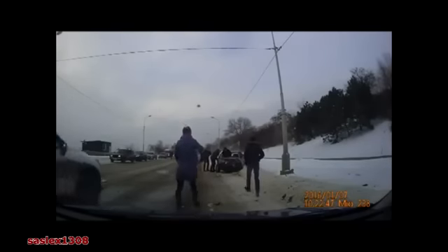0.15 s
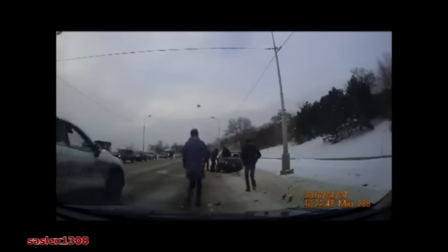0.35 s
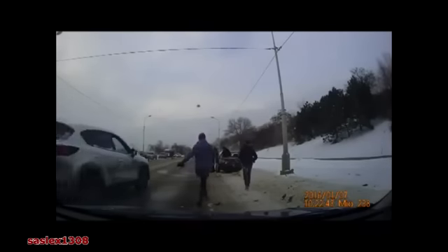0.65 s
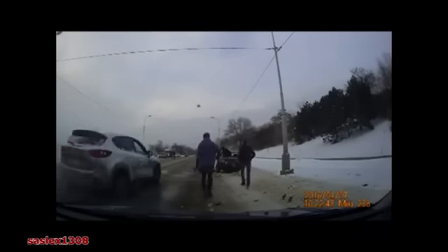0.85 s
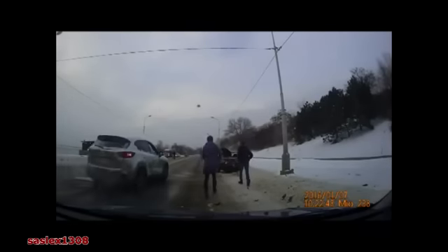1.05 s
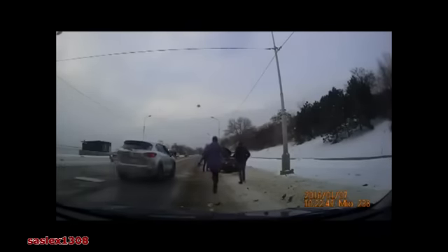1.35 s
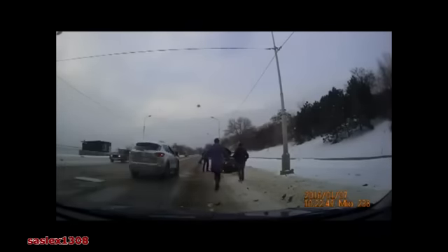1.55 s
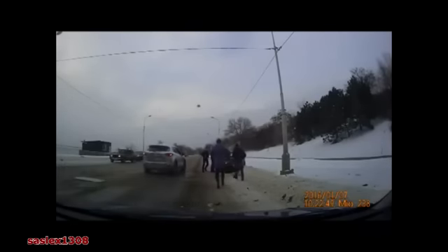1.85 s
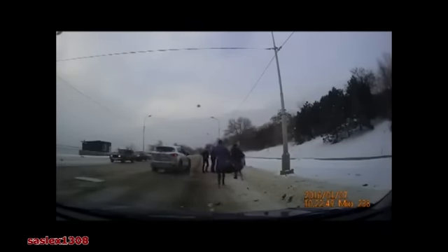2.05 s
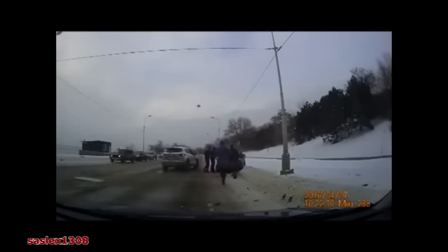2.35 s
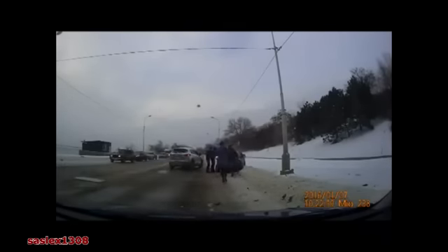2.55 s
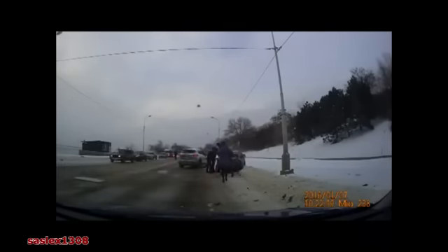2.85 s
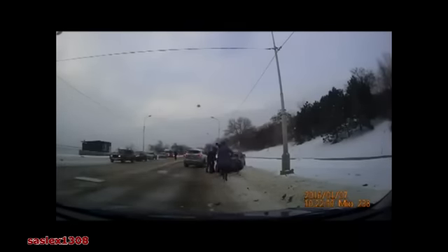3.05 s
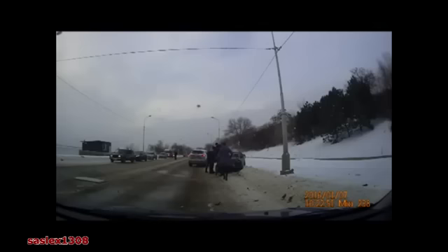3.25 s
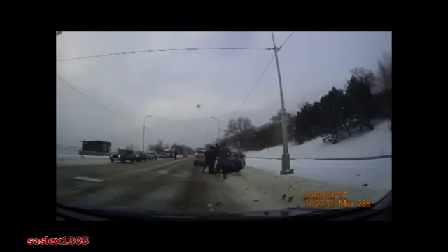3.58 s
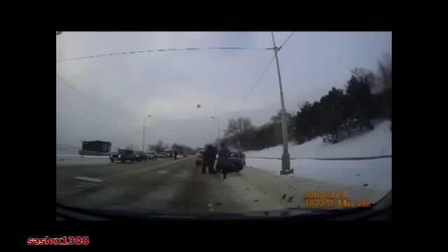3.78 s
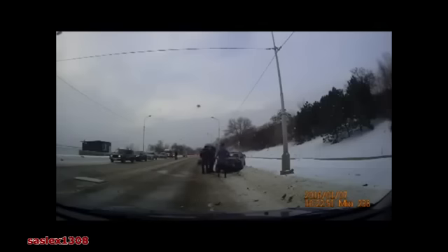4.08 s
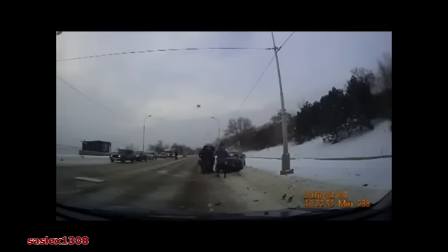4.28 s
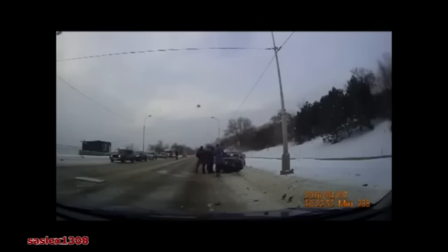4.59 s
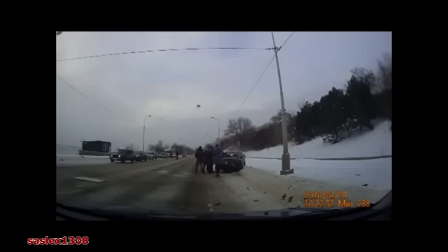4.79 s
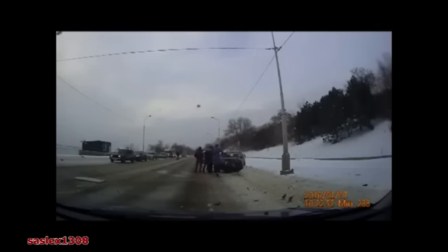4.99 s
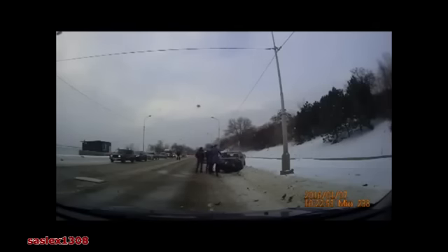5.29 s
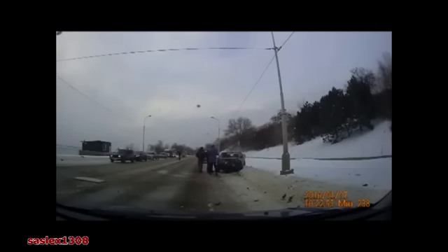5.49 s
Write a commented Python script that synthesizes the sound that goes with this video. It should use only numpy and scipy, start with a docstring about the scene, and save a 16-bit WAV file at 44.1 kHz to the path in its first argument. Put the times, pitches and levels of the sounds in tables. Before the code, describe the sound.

Inside a stopped car, a microphone at the windscreen picks up a hazard flasher relay, its dry tick starting at about 0.13 seconds and repeating roughly every 0.75 seconds, each followed about 0.3 seconds later by a slightly different tock. A low engine boom with a faint panel drone holds for about 0.3 seconds, then dies away, leaving a very weak idle rumble. Tiny creaks and rustles occur within the first second. At 0.93 to 0.96 seconds the gear lever clunks home: several fast, gritty latch clacks and a heavier hollow console thump, the loudest moment. A thin hiss near 3 kHz opens around it, sags and closes by 3.8 seconds. Muffled traffic swells slightly near 1 second, then settles. Faint rustles follow around 1.6 seconds, very soft bumps at 4.7 and 5.4, and one light trim knock at 5.53. Steady microphone hiss runs throughout.

```python
"""Inside a stopped car the hazard flasher relay goes tick-tock over the low hum of the idling engine.
Something creaks; the hum is already dying down when the gear lever clunks home; a thin hiss swells and
fades. Near the end comes one light knock on the trim. Contacts are impulses ringing damped modes; the
cabin's answer, rustles, bumps, rumble, traffic, soft low bursts and hiss are coloured noise; hum and
creaks are wavering sines."""
import sys
import numpy as np
from scipy import signal
from scipy.fft import irfft, next_fast_len
from scipy.io import wavfile

SR = 44100
rng = np.random.default_rng(int(sys.argv[2]) if len(sys.argv) > 2 else 0)


def materialize(psi):
    """Save the field psi as 16-bit PCM at rate SR to the path in sys.argv[1].

    A 1-D psi becomes a single channel; in a 2-D psi each row is a channel.
    """
    bounded = np.clip(np.atleast_2d(psi).T, -1, 1)
    quanta = np.round(bounded * 32767).astype(np.int16)
    wavfile.write(sys.argv[1], SR, quanta)


N = 248283
TIME = np.arange(N) / SR  # seconds


# The flasher's timer counts in steps. Each row, one flash: steps lit, steps dark.
FLASH_STEPS = [(18, 29), (18, 30), (17, 31), (17, 30), (17, 30), (19, 29), (17, 30), (17, 30)]
TIMER_STEP_S, FIRST_FLASH_S = 0.016, 0.1322


def flasher_times():
    """Timed switching: the relay pulls in (tick) when the lamp lights and lets go (tock) when it darkens."""
    lit, dark = np.transpose(FLASH_STEPS) * TIMER_STEP_S
    period = lit + dark
    ticks = FIRST_FLASH_S + np.cumsum(period) - period
    tocks = ticks + lit
    return ticks, tocks[tocks < TIME[-1]]


# Colour of the dull, quickly dying cabin reflections.
# Each row: frequency in Hz, relative density in dB per Hz.
CABIN_COLOUR = [(150, -5), (400, 1), (750, -10.5), (1000, -1.5), (1400, -4), (2000, 5.5), (2700, 0),
                (3600, -11), (4600, -25), (5700, -10), (7500, -29)]


def relay_strokes(strokes, bounces, modes, level_db, scatter_db, cabin_db, cabin_t60):
    """Impact excitation: each stroke repeats its bounces at scattered strengths; the cabin answers briefly."""
    chance = rng.standard_normal((len(strokes), len(bounces)))
    contacts = []
    for i, stroke in enumerate(strokes):
        for k, (delay, bounce_db) in enumerate(bounces):
            contacts.append((stroke + delay, bounce_db + scatter_db * chance[i, k]))
    ringing = from_db(level_db) * ring(clicks(contacts), modes)
    decay = dying(strokes, np.zeros(len(strokes)), t60=cabin_t60, rise_s=0.0057)
    return ringing + from_db(cabin_db) * decay * noise(CABIN_COLOUR)


# The armature hits and bounces on pulling in.
# Each row: delay after the stroke in seconds, relative strength in dB.
TICK_BOUNCES = [(0.0, 1.5), (0.00152, 4.5), (0.00353, -5), (0.00621, -6.5), (0.00949, -9), (0.0148, -7.5)]
# Relay and housing ringing at this stop.
# Each row: frequency in Hz, relative level in dB, 60 dB decay time in seconds.
TICK_MODES = [(1573, -53.5, 0.064), (1832.5, -38.5, 0.058), (1996, -61, 0.092), (2100, -63.5, 0.06),
              (2206, -44.5, 0.025), (2554, -63.5, 0.069), (2726, -53.5, 0.018), (3504, -56, 0.045),
              (3590, -45, 0.0082), (3764, -58, .05)]


def relay_tick(strokes):
    """Modal ringing: the armature's bounces at the pull-in stop strike relay and housing."""
    return relay_strokes(strokes, TICK_BOUNCES, TICK_MODES, level_db=-1.65, scatter_db=0.2,
                         cabin_db=-49.0, cabin_t60=0.053)


# The armature hits and bounces on letting go.
# Each row: delay after the stroke in seconds, relative strength in dB.
TOCK_BOUNCES = [(0.0, 0.5), (0.00187, -11), (0.00585, 3), (0.01024, 1.9), (0.0109, -3.5)]
# Relay and housing ringing at the other stop.
# Each row: frequency in Hz, relative level in dB, 60 dB decay time in seconds.
TOCK_MODES = [(769, -55, 0.083), (901, -57.5, 0.077), (1620, -88, 0.12), (1891, -50, 0.045),
              (2260, -69, 0.12), (2501, -45.5, 0.03), (2619, -43.5, 0.07), (2890, -64.5, 0.087),
              (3450, -63, 0.033)]


def relay_tock(strokes):
    """Modal ringing: the other stop excites another set of modes of the same relay and housing."""
    return relay_strokes(strokes, TOCK_BOUNCES, TOCK_MODES, level_db=-1.0, scatter_db=1.26,
                         cabin_db=-51.5, cabin_t60=0.074)


# The lever is unlocked, rides over two detents and lands. Each row: start in seconds,
# strength on the latch in dB, strength on the console in dB, gap to the first bounce in seconds.
LEVER_BLOWS = [(0.92632, -7, -10, 0.0024), (0.93405, 3.5, -4.5, 0.0031), (0.94823, -1.5, -4, 0.00685),
               (0.96044, 1, 5.5, 0.00606)]
# Ratio of one gap to the one before, and loss per bounce on latch and console.
BOUNCE_GAP_RATIO, LATCH_LOSS_DB, CONSOLE_LOSS_DB = 0.895, 3.5, 3


def lever_contacts(count):
    """Inelastic bouncing: each blow is a run of closer, weaker contacts (s, latch dB, console dB)."""
    contacts = []
    for start, latch_db, console_db, gap in LEVER_BLOWS:
        for k in range(count):
            s = start + gap * sum(BOUNCE_GAP_RATIO ** j for j in range(k))
            contacts.append((s, latch_db - LATCH_LOSS_DB * k, console_db - CONSOLE_LOSS_DB * k))
    return contacts


# Modes of the latch.
# Each row: frequency in Hz, level in dB for a 0 dB blow, 60 dB decay time in seconds.
LATCH_MODES = [(754, -44, 0.072), (950, -43, 0.055), (1034, -42, 0.11), (1203, -46.5, 0.13),
               (1273, -50, 0.09), (1430, -46, 0.023), (1810, -53, 0.021), (2184, -44.5, 0.047),
               (2390, -39.5, 0.071), (2565, -34.5, 0.019), (2690, -46, 0.078), (2770, -39.5, 0.019),
               (2990, -42, 0.026), (3200, -45.5, 0.034), (3520, -45.5, 0.031), (3750, -46.5, 0.032),
               (4150, -50, 0.024)]
# Modes of the console, which rings on after the lever lands.
# Each row: frequency in Hz, level in dB for a 0 dB blow, 60 dB decay time in seconds.
CONSOLE_MODES = [(192, -62, 0.75), (224, -48.5, 0.14), (294, -45, 0.12), (353, -55, 0.15), (413, -41, 0.12),
                 (468, -46.5, 0.16), (560, -47, 0.1), (668, -54, 0.13)]
# Colour of the gritty edge of each contact.
# Each row: frequency in Hz, relative density in dB per Hz.
GRIT_COLOUR = [(1500, 0), (3000, 5.5), (4500, 6), (5200, 3), (5900, -1.5), (6800, 0), (7600, 0), (8800, -4),
               (10400, 2), (11500, -5.5), (13000, -8), (16000, -26)]


def gear_lever():
    """Impact on coupled bodies: contacts ring latch and console, add gritty noise and stir the cabin."""
    s, latch_db, console_db = np.transpose(lever_contacts(count=3))
    latch = ring(clicks(zip(s, latch_db)), LATCH_MODES)
    console = ring(clicks(zip(s, console_db)), CONSOLE_MODES)
    latch_grit = from_db(-58.5) * dying(s, latch_db, t60=0.092, rise_s=0.0016)
    console_grit = from_db(-54.5) * dying(s, console_db, t60=0.062, rise_s=0.001)
    roughness = from_db(2 * drift(169.9))
    grit = (latch_grit + console_grit) * roughness * noise(GRIT_COLOUR)
    reflections = from_db(-49.5) * dying(s, latch_db, t60=0.16, rise_s=0.0078) * noise(CABIN_COLOUR)
    return latch + console + grit + reflections


# The two contacts of the light knock. Each row: start in seconds, strength in dB.
KNOCK_CONTACTS = [(5.5255, -11), (5.5295, 4.5)]
# Modes of the trim.
# Each row: frequency in Hz, level in dB for a 0 dB contact, 60 dB decay time in seconds.
TRIM_MODES = [(259, -61, 0.16), (908, -49.5, 0.043), (1103, -60, 0.11), (1420, -62, .04),
              (1900, -64, 0.044), (3340, -63, .035)]


def trim_knock():
    """Modal ringing: two close contacts excite the damped modes of the trim."""
    return ring(clicks(KNOCK_CONTACTS), TRIM_MODES)


# Faint creaks. Each row: start in seconds, length in seconds, start pitch in Hz, end pitch in Hz,
# level in dB (rms at the crest of the swell).
CREAKS = [(0.04, .11, 534, 529, -60.5), (0.493, 0.098, 529, 590, -57.5), (0.634, 0.099, 870, 773, -65.5),
          (0.788, 0.097, 765, 808, -56.5), (0.994, 0.072, 480, 521, -57)]


def creaks():
    """Gliding tones: each creak is a wavering sine that slides in pitch under a half-sine swell."""
    out = np.zeros(N)
    for start, length, start_hz, end_hz, db in CREAKS:
        pitch = np.interp(TIME, [start, start + length], [start_hz, end_hz])
        out += from_db(db) * swell(start, length) * tone(pitch, waver=0.00594)
    return out


# Soft rustles. Each row: start in seconds, length in seconds, level in dB (rms at the crest).
RUSTLES = [(0.505, 0.09, -57), (.74, 0.056, -61.5), (1.555, 0.064, -58.5), (1.705, 0.065, -62.5),
           (5.521, 0.036, -62)]
# Their colour. Each row: frequency in Hz, relative density in dB per Hz.
RUSTLE_COLOUR = [(150, 4.5), (400, -6.5), (700, -2), (1100, -6), (1600, -17), (2500, -11), (5000, -33),
                 (12000, -26)]


def rustles():
    """Amplitude-shaped noise: each rustle is a short swell of one coloured noise."""
    return noise(RUSTLE_COLOUR) * sum(from_db(db) * swell(s, length) for s, length, db in RUSTLES)


# Dull bumps through the body. Each row: start in seconds, length in seconds,
# level in dB (rms at the crest).
BUMPS = [(0.836, 0.068, -53), (0.926, 0.15, -52.5), (1.605, 0.049, -62), (4.671, 0.084, -64),
         (5.426, 0.08, -64.5)]
# Colour of the body's low motion. Each row: frequency in Hz, relative density in dB per Hz.
BODY_COLOUR = [(40, -5), (80, -4), (130, -9), (200, -11.5), (400, -38)]


def body_bumps():
    """Amplitude-shaped noise: each bump is a short swell of low noise carried by the body."""
    return noise(BODY_COLOUR) * sum(from_db(db) * swell(s, length) for s, length, db in BUMPS)


# Partials of the boom. Each row: multiple of its pitch, level in dB relative to BOOM_DB.
BOOM_PARTIALS = [(1, -0.5), (2, -27), (3, -19), (6, -26.5), (8, -27)]
# The boom of the loaded engine holds, then dies away with the shudder of the body.
BOOM_HZ, BOOM_DB, SHUDDER_DB = 66.14, -47.5, -60.5
BOOM_ATTACK_S, BOOM_HOLD_S, BOOM_FALL_DB_PER_S = 0.026, 0.28, 12.5
# A panel drones along on the boom's fourth multiple: it builds up later and dies faster.
DRONE_DB, DRONE_START_S, DRONE_ATTACK_S = -61.5, 0.069, 0.18
DRONE_HOLD_S, DRONE_FALL_DB_PER_S = 0.16, 19.5


def engine_under_load():
    """Harmonic series: boom partials and a panel drone share one wavering phase, above a noisy shudder."""
    load = envelope(0, BOOM_ATTACK_S, BOOM_HOLD_S, BOOM_FALL_DB_PER_S)
    panel = envelope(DRONE_START_S, DRONE_ATTACK_S, DRONE_HOLD_S, DRONE_FALL_DB_PER_S)
    phase = 2 * np.pi * np.cumsum(BOOM_HZ * (1 + 0.006 * drift(8))) / SR
    partials = sum(from_db(db + drift(9.3)) * np.sin(multiple * phase) for multiple, db in BOOM_PARTIALS)
    boom = from_db(BOOM_DB) * np.sqrt(2) * partials
    shudder = from_db(SHUDDER_DB) * noise(BODY_COLOUR)
    drone = from_db(DRONE_DB + 1.4 * drift(12)) * panel * np.sqrt(2) * np.sin(4 * phase)
    return load * (boom + shudder) + drone


# Weak lines of the idle. Each row: frequency in Hz, rms level in dB before it wavers.
IDLE_LINES = [(87, -71.5), (130, -82)]
# Colour of the steady rumble. Each row: frequency in Hz, relative density in dB per Hz.
RUMBLE_COLOUR = [(15, -39), (28, 9), (40, 5), (60, -2), (85, -9), (110, -19), (150, -24.5), (250, -38)]


def engine_idle():
    """Lines over a continuum: wavering sines lie in a steady low rumble of noise."""
    lines = sum(from_db(db + 2.2 * drift(6.6)) * tone(hz, waver=0.019) for hz, db in IDLE_LINES)
    return lines + from_db(-61.5) * noise(RUMBLE_COLOUR)


# The thin hiss near 3 kHz. Each row: frequency in Hz, relative density in dB per Hz.
THIN_HISS_COLOUR = [(1500, -27), (2300, -9.5), (2650, -2.5), (2950, 0.5), (3250, -7.5), (3700, -19),
                    (5000, -29)]
# It opens around the clunk, sags, and closes down to a faint rest.
HISS_DB, HISS_REST_DB, HISS_SAG_DB_PER_S = -68, -81, 2.8
HISS_START_S, HISS_ATTACK_S, HISS_END_S, HISS_RELEASE_S = 0.84, 0.11, 3.8, 0.67


def thin_hiss():
    """Band noise: the swell and the faint rest add in energy, and the level flickers."""
    closing = np.clip((HISS_END_S - TIME) / HISS_RELEASE_S, 0, 1)
    opening = envelope(HISS_START_S, HISS_ATTACK_S, 0, HISS_SAG_DB_PER_S) * closing
    level = np.hypot(from_db(HISS_DB) * opening, from_db(HISS_REST_DB))
    return level * from_db(2.1 * drift(40)) * noise(THIN_HISS_COLOUR)


# Course of the muffled traffic. Each row: time in seconds, level in dB before it fluctuates.
TRAFFIC_LEVEL = [(0, -66), (.6, -65), (1.05, -61), (1.35, -66), (2.6, -69.5), (5.6, -69.5)]
# Its colour. Each row: frequency in Hz, relative density in dB per Hz.
TRAFFIC_COLOUR = [(150, -48), (230, -8), (300, 1), (430, 0), (620, -4), (850, -4), (1300, -10),
                  (2200, -10.5), (4000, -19)]
# Colour of the soft low bursts. Each row: frequency in Hz, relative density in dB per Hz.
LOW_BURST_COLOUR = [(130, -39), (180, -0.5), (240, 3.5), (300, 5.5)]


def traffic_and_low_bursts():
    """Modulated noise: muffled traffic fluctuates, and soft low noise bursts come and go at random."""
    seconds, levels = np.transpose(TRAFFIC_LEVEL)
    level_db = np.interp(TIME, seconds, levels)
    traffic = from_db(level_db + 1.6 * drift(18)) * noise(TRAFFIC_COLOUR)
    burst_gain = np.clip(drift(30) - 0.55, 0, 0.8)  # only the upper excursions sound
    low_bursts = from_db(level_db + 2.0) * burst_gain * noise(LOW_BURST_COLOUR)
    return traffic + low_bursts


# Colour of the microphone's own noise. Each row: frequency in Hz, relative density in dB per Hz.
MIC_COLOUR = [(300, 5), (2000, 1.5), (4500, 1.5), (6500, 0.5), (8000, 0.5), (11000, -2), (14000, -5),
              (15500, -11)]


def microphone_noise():
    """Stationary noise: the microphone's own hiss has constant level and colour."""
    return from_db(-67.5) * noise(MIC_COLOUR)


def from_db(db):
    """Logarithmic level: 20 dB is a tenfold amplitude."""
    return 10 ** (np.asarray(db) / 20)


def noise(colour):
    """Spectral shaping: random Fourier coefficients weighted by the colour give noise of rms 1."""
    hz, db = np.transpose(colour)
    bins = np.maximum(np.fft.rfftfreq(next_fast_len(N, True), 1 / SR), 1)
    gain = from_db(np.interp(np.log(bins), np.log(hz), db, left=-90, right=-90))
    spectrum = rng.standard_normal(len(bins)) + 1j * rng.standard_normal(len(bins))
    x = irfft(gain * spectrum)[:N]
    return x / x.std()


def drift(rate):
    """Slow random modulation: lines join unit-variance draws about 0, rate of them a second."""
    turns = rng.standard_normal(N // 100)
    return np.interp(TIME * rate, np.arange(len(turns)), turns)


def clicks(rows):
    """Impulsive force: one single-sample impulse for each (s, dB) row."""
    out = np.zeros(N)
    for s, db in rows:
        out[round(s * SR)] += from_db(db)
    return out


def ring(force, modes):
    """Modal superposition: damped resonators in parallel; neighbours in the list swing in opposite senses."""
    out = np.zeros(N)
    force = force + 1e-18  # keeps the decaying filters off vanishingly small numbers
    for k, (hz, db, t60) in enumerate(modes):
        r = from_db(-60 / (t60 * SR))  # decay per sample
        w = 2 * np.pi * hz / SR
        mode = signal.lfilter([0, np.sin(w)], [1, -2 * r * np.cos(w), r * r], force)
        out += (-1) ** k * from_db(db) * mode
    return out


def dying(times, levels_db, t60, rise_s):
    """Exponential decay: energies of successive blows add up, each falling 60 dB in t60."""
    age = np.maximum(TIME - np.asarray(times)[:, None], 0)
    decay = from_db(np.asarray(levels_db)[:, None] - 60 * age / t60)
    each = decay * np.minimum(age / rise_s, 1)
    return np.sqrt(np.sum(each ** 2, axis=0))


def envelope(start_s, attack_s, hold_s, fall_db_per_s):
    """Attack, hold and exponential release: rises to 1, holds, then falls evenly in dB."""
    age = TIME - start_s
    fall = from_db(-fall_db_per_s * np.maximum(age - attack_s - hold_s, 0))
    return np.clip(age / attack_s, 0, 1) * fall


def swell(start, length):
    """Half-sine window: a smooth rise and fall."""
    return np.sin(np.pi * np.clip((TIME - start) / length, 0, 1))


def tone(hz, waver):
    """Frequency modulation: a sine of rms 1 whose pitch wanders by the share waver."""
    phase = 2 * np.pi * np.cumsum(hz * (1 + waver * drift(12))) / SR
    return np.sqrt(2) * np.sin(phase)


def scene():
    """Superposition: all sources add at the windscreen."""
    ticks, tocks = flasher_times()
    relay = relay_tick(ticks) + relay_tock(tocks)
    handling = gear_lever() + trim_knock() + creaks() + rustles() + body_bumps()
    engine = engine_under_load() + engine_idle()
    background = thin_hiss() + traffic_and_low_bursts() + microphone_noise()
    return (relay + handling + engine + background)[None]


def record(dry):
    """Band limiting: a steep elliptic filter cuts the top; the converter adds a steady offset."""
    lowpass = signal.ellip(10, 0.1, 70, 15100, fs=SR, output="sos")  # ripple dB, stopband dB, cutoff Hz
    return signal.sosfilt(lowpass, dry) - 0.085  # offset as a share of full scale


dry = scene()
out = record(dry)
materialize(out)
```